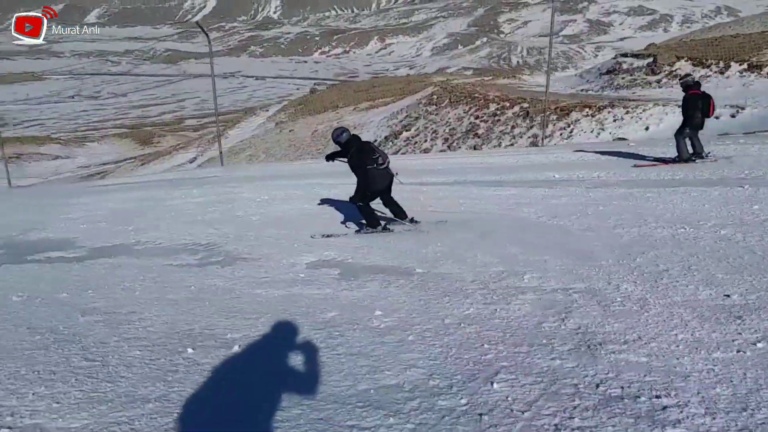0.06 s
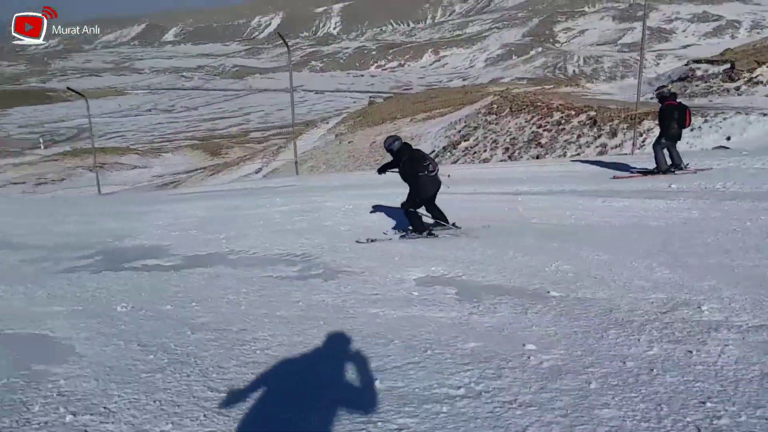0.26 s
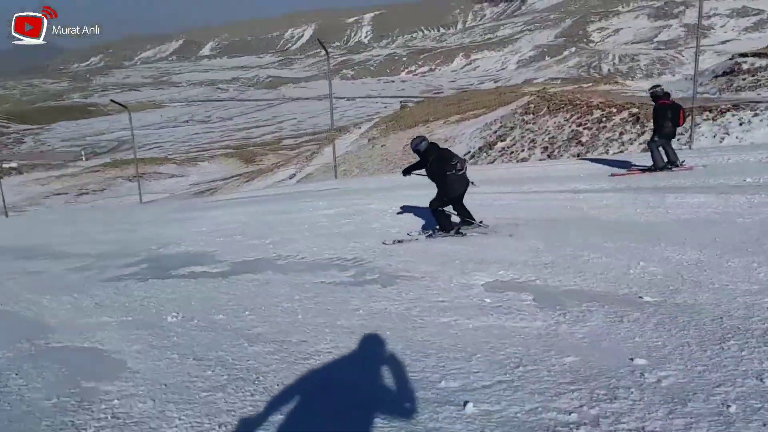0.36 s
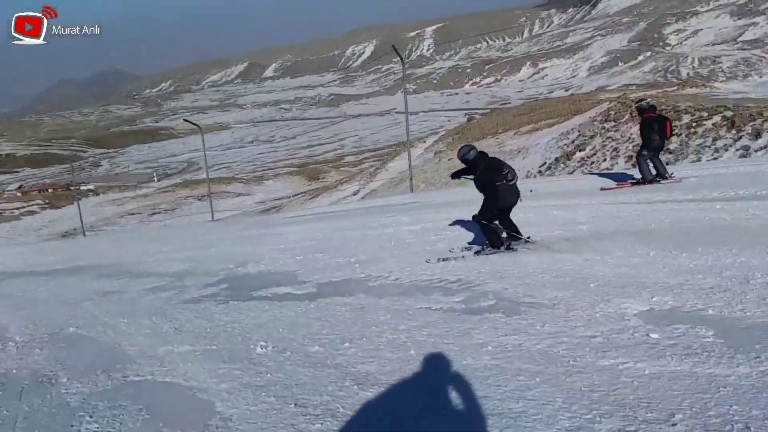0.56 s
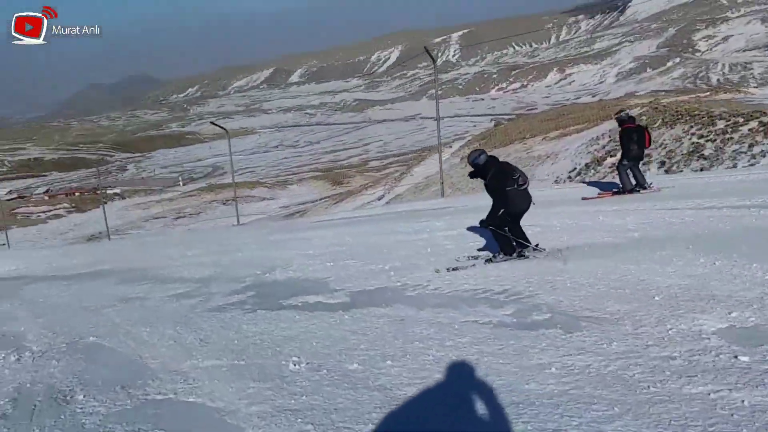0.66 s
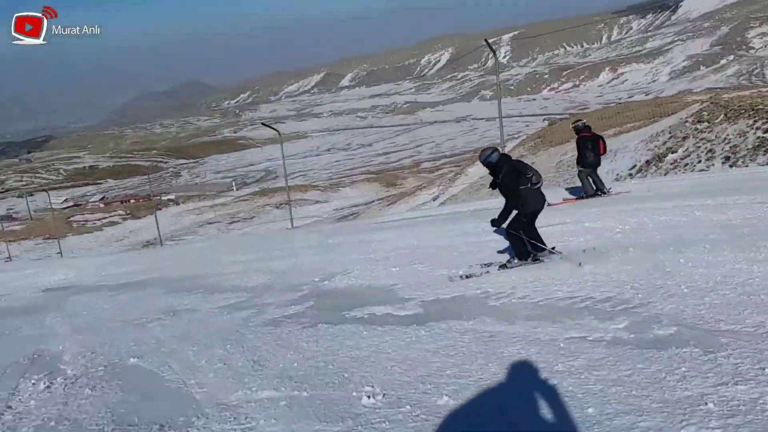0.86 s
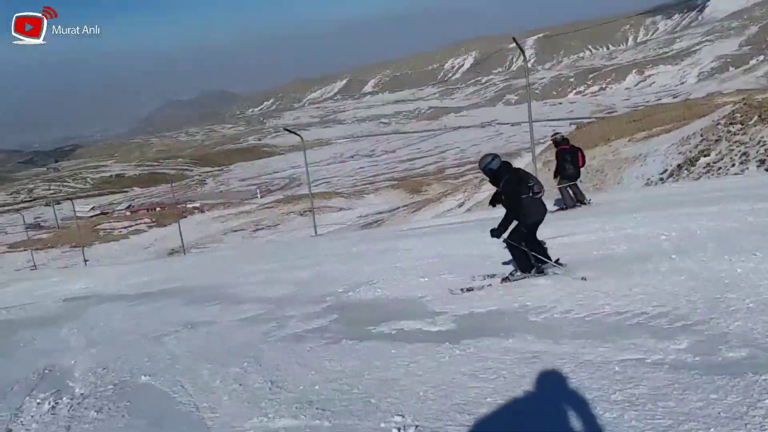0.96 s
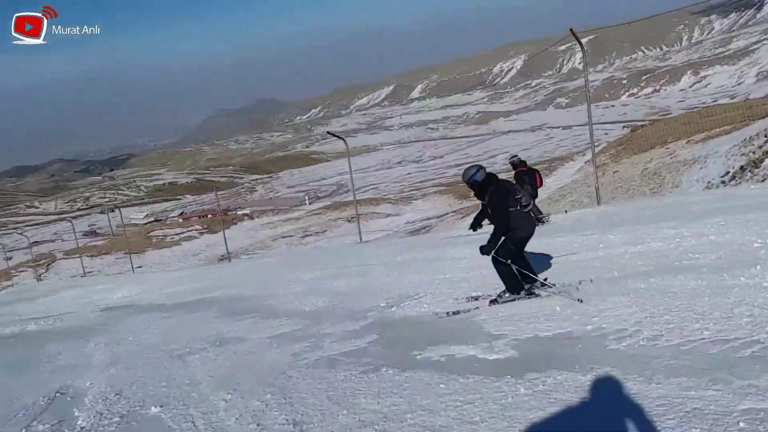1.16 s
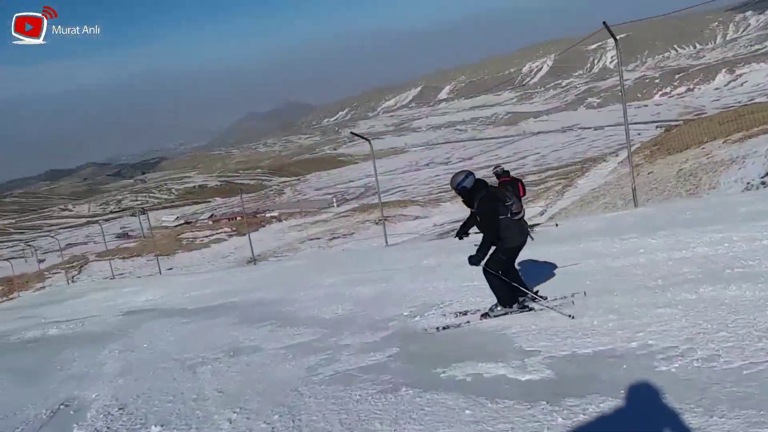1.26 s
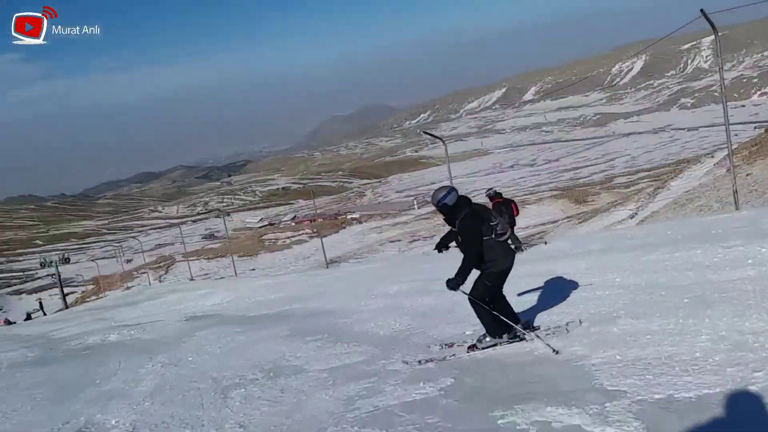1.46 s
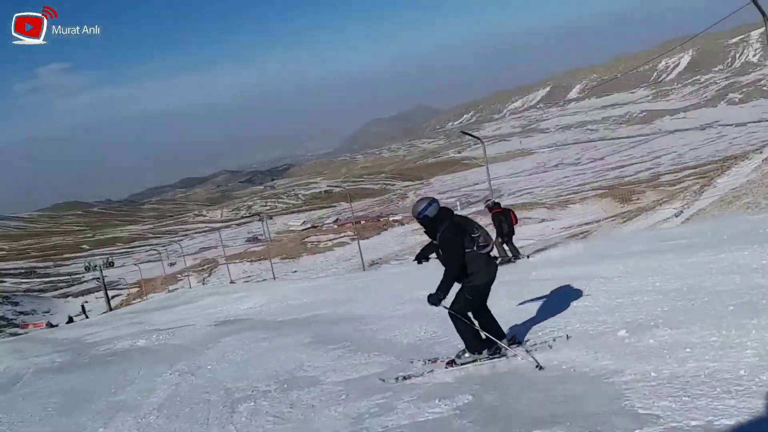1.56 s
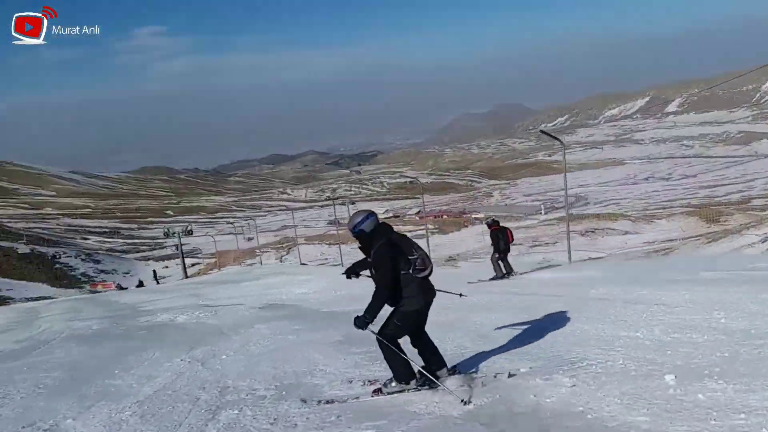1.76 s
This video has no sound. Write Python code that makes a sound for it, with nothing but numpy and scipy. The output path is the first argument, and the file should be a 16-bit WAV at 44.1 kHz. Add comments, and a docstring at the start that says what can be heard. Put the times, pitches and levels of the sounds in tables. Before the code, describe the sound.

A ski turn scraping on hard, icy snow, heard close outdoors. Faint crunchy gliding begins, then from 0.2 seconds the edges bite and the scrape swells to a coarse, low-mid roar by 0.4, with wind buffeting on the left. It stays loud until about 1.15, with hissing spray, hollow knocks and a faint steely rasp, then falls away by 1.5 to soft crunching and small clicks.

```python
"""A hard carved turn on icy snow

Steel ski edges chip the crust: random clicks in bursts, filtered by the ski body, with hissing ice spray.
The edge sings faintly as it bites deeper, and the flat bases crunch and knock over lumps of ice.
The sound reaches two microphone ports with differing colour and phase; gusts buffet mainly the left port."""
import sys
import numpy as np
from scipy import signal
from scipy.fft import rfft, irfft, next_fast_len
from scipy.io import wavfile
from scipy.ndimage import uniform_filter1d, minimum_filter1d

SR = 44100
rng = np.random.default_rng(int(sys.argv[2]) if len(sys.argv) > 2 else 0)


def inscribe(sig):
    """Save sig as 16-bit PCM at rate SR to the path in sys.argv[1].

    A 1-D sig is mono; a 2-D sig holds one channel per row.
    Samples are clipped to [-1, 1] before scaling.
    """
    pcm = np.round(np.clip(np.atleast_2d(sig).T, -1, 1) * 32767)
    wavfile.write(sys.argv[1], SR, pcm.astype(np.int16))


def undo_db(level):
    """Turn decibels back into plain size, where 20 dB means ten times bigger."""
    steps = np.asarray(level, float) / 20
    return 10 ** steps


N = 79380  # samples, 1.8 s


def evened(x):
    """Normalisation: scales the mean power to 1."""
    return x / np.sqrt(np.mean(x ** 2) + 1e-20)


def read(points, hz):
    """Spectral interpolation: reads a curve on a log-frequency axis."""
    point_hz, value = np.transpose(points)
    return np.interp(np.log(hz + 1), np.log(point_hz + 1), value)


def along(rows, column=1):
    """Envelope: reads one column of a time curve at every sample."""
    rows = np.array(rows)
    return np.interp(np.arange(N) / SR, rows[:, 0], rows[:, column])


def colour(x, points, size=4096):
    """Minimum-phase filtering: the spectrum in dB fixes a causal response through the Hilbert transform."""
    log_gain = read(points, np.abs(np.fft.fftfreq(size, 1 / SR))) * np.log(10) / 20
    phase = -signal.hilbert(log_gain).imag
    taps = np.fft.ifft(np.exp(log_gain + 1j * phase)).real[:size // 2]
    return signal.oaconvolve(x, taps[None], axes=1)[:, :x.shape[1]]


def wobble(low_hz, top_hz):
    """Superposition: thirty slow sines of random phase make an irregular sway of rms 1."""
    t = np.arange(N) / SR
    sway = 0
    for hz in np.geomspace(low_hz, top_hz, num=30):
        sway = sway + np.sin(2 * np.pi * (hz * t + rng.random())) / hz ** 0.074
    return evened(sway)


def chips(per_s, spread_db):
    """Shot noise: random clicks, most small, a few large; one train straight on, one scattered."""
    boost_db = spread_db * np.minimum(rng.exponential(1, (2, N)), 5)
    size = undo_db(boost_db) * rng.standard_normal((2, N))
    return size * (rng.random((2, N)) < per_s / SR)


# Edge pressure through the turn. Each row: time in seconds, scrape level in dB, spray level in dB,
# extra flex of the whole ski, heard in the lowest range, in dB.
TURN = [(0, -35, -43.5, 0), (.15, -32.5, -40, -2), (.2, -25.5, -37.5, 0), (.29, -15.5, -33, 0),
        (.36, -10.5, -31.5, 1.5), (.45, -9, -28, 3), (.6, -9.5, -31, -7), (.75, -9.5, -31, -4),
        (.95, -11.5, -37.5, 0), (1.056, -11, -32, -0.5), (1.085, -12.5, -34, 1), (1.115, -11, -32, 0),
        (1.19, -15, -38.5, 1), (1.25, -17.5, -38.5, -4), (1.3, -20, -38, 1), (1.345, -21, -42, 3),
        (1.39, -27.5, -40, 0), (1.5, -32, -40.5, 2.5), (1.61, -33.5, -41.5, 0), (1.8, -37.5, -39.5, 3)]
RASP_DB, RASP_FROM_S, RASP_FULL_S = -26, 0.4, 0.93  # full level relative to the scrape; onset and full bite


def carved_turn():
    """Common modulation: scrape and spray share one chatter and follow the edge pressure."""
    chatter = wobble(20, 110)
    scrape = edge_scrape(chatter, along(TURN, column=3))
    spray = ice_spray(chatter)
    bite = np.clip((np.arange(N) / SR - RASP_FROM_S) / (RASP_FULL_S - RASP_FROM_S), 0, 1)
    scrape = scrape + undo_db(RASP_DB) * bite * steel_rasp()
    return scrape * undo_db(along(TURN, column=1)) + spray * undo_db(along(TURN, column=2))


CHIPS_PER_S, CHIP_SPREAD_DB = 1100, 2  # base rate of each train; mean boost of a chip
CHATTER_DB, PATCH_DB = 1, 0.72  # rms level sway shared by all patches, and of each patch alone
# Each stretch of edge shakes one range of the ski. Each entry: boundary between ranges in Hz.
PATCH_EDGES_HZ = [0, 230, 420, 780, 1500, 2700, 4500, 23000]
# Ski body shaken by the edge. Each row: frequency in Hz, relative level per Hz in dB.
SCRAPE = [(24, -48), (40, -52), (69, -29), (101, -20.5), (187, -7), (224, -2.5), (329, -1), (422, -4.5),
          (567, -7), (727, -11), (833, -15), (912, -12), (1140, -10.5), (1570, -21), (1970, -22.5),
          (2160, -22.5), (2750, -29.5), (3500, -27.5), (4170, -30.5), (8040, -42), (9000, -58),
          (11700, -81), (19800, -120)]


def edge_scrape(chatter, flex_db):
    """Forced vibration: chips break off in bursts along the edge and shake the ski, range by range."""
    hz = np.fft.rfftfreq(N, 1 / SR) + 1  # 1 Hz is added to avoid dividing by zero
    body = 0
    for low, top in zip(PATCH_EDGES_HZ, PATCH_EDGES_HZ[1:]):
        bursts_db = CHATTER_DB * chatter + PATCH_DB * wobble(17, 90)
        patch = evened(chips(CHIPS_PER_S + 2 * low, CHIP_SPREAD_DB)) * undo_db(bursts_db)
        if low == 0:
            patch = patch * undo_db(flex_db)
        band = 1 / np.sqrt((1 + (low / hz) ** 10) * (1 + (hz / top) ** 10))
        body = body + rfft(patch) * band
    return evened(colour(irfft(body, N), SCRAPE))


GRAINS_PER_S, GRAIN_SPREAD_DB, SPRAY_CHATTER_DB = 13000, 1.5, 0.5
# Hiss of flying ice. Each row: frequency in Hz, relative level per Hz in dB.
SPRAY = [(300, -24), (1200, -5), (2000, 1.5), (2750, -3), (3400, -14), (4500, -12.5), (8000, -13.5),
         (9800, -20), (13000, -21), (16000, -25.5)]


def ice_spray(chatter):
    """Dense shot noise: thousands of grains merge into a hiss that sways partly with the chatter."""
    sway_db = SPRAY_CHATTER_DB * (1.3 * chatter + wobble(16, 35.0))
    return evened(colour(chips(GRAINS_PER_S, GRAIN_SPREAD_DB) * undo_db(sway_db), SPRAY))


RASP_HZ, RASP_WIDTH_HZ = 3330, 410  # centre; full width at half amplitude


def steel_rasp():
    """Resonance: chips excite the steel edge in one band, so that it sings."""
    hz = np.fft.rfftfreq(N, 1 / SR) + 1
    steel = 1 / (1 + ((hz - RASP_HZ) / (RASP_WIDTH_HZ / 2)) ** 2)
    scratches = chips(CHIPS_PER_S, CHIP_SPREAD_DB) * undo_db(PATCH_DB * 2 * wobble(6.2, 40))
    return evened(irfft(rfft(scratches) * steel, N))


CRUMBS_PER_S, CRUMB_SPREAD_DB, GLIDE_WAVER_DB = 4300, 1, 1.3
# Bases sliding flat. Each row: time in seconds, level in dB.
GLIDE = [(0, -32), (.2, -31.5), (.7, -35.5), (1.3, -40), (1.55, -35), (1.63, -43), (1.68, -34),
         (1.705, -33.5), (1.74, -32.5), (1.8, -29)]
# Colour of the sliding. Each row: frequency in Hz, relative level per Hz in dB.
GLIDE_TONE = [(35, -60), (60, -25), (128, -4), (244, -14), (458, -5.5), (727, -2), (1420, -1.5), (1990, -7),
              (2160, -10), (3970, -6.5), (9000, -25), (11700, -68), (19800, -120)]


def bases():
    """Friction noise: flat sliding crushes crumbs into a finer, brighter crunch."""
    crumbs = chips(CRUMBS_PER_S, CRUMB_SPREAD_DB) * undo_db(GLIDE_WAVER_DB * wobble(25, 110))
    return evened(colour(crumbs, GLIDE_TONE)) * undo_db(along(GLIDE))


RING_WIDTH = .25  # bandwidth of each resonator, as a share of the ring pitch
FIRST_BLOW, BLOWS_PER_S = 3.5, 3500  # the first contact against the rms size of later ones; their rate
CRACK_EASE = .6  # share of the first contact that the snow cushions out of the crack
# Skis knocking over lumps of ice. Each row: start in seconds, peak of the ring in dB, ring pitch in Hz,
# peak of the crack relative to the ring in dB, time for the blows to fall by 20 dB in seconds (at least .002).
KNOCKS = [(0.172, -20, 365, -25, 0.015), (0.235, -39, 400, 9, 0.0081), (0.246, -37, 680, 8, 0.012),
          (0.276, -15.5, 279, 3, .015), (0.316, -13, 269, 0.5, 0.019), (0.601, -3.5, 347, -19, 0.013),
          (.677, -5, 580, -2, 0.013), (0.843, -8, 460, -16, 0.0051), (0.875, -6.5, 387, -10, .014),
          (1.018, -15.5, 395, 5, 0.014), (1.051, -10, 330, 2.5, 0.013), (1.114, -10, 298, -7, 0.013),
          (1.16, -5.5, 302, -15, 0.013), (1.211, -19, 330, -2, .008), (1.319, -17, 450, -5, .01),
          (1.402, -18.5, 390, -17, 0.013), (1.434, -18.5, 562, -18, 0.019), (1.51, -24, 330, -2, 0.015),
          (1.664, -20, 610, -3, 0.0045), (1.667, -20.5, 429, 1.5, 0.026), (1.711, -38, 356, 15, 0.0071),
          (1.716, -27.5, 400, 5, 0.017), (1.772, -38, 1110, 4, 0.0025), (1.781, -19, 960, -13, 0.0049),
          (1.796, -22, 940, 11, 0.0044)]
# Colour of the crack. Each row: frequency in Hz, relative level per Hz in dB.
KNOCK_CRACK = [(250, -28), (600, 1), (1200, -2), (2500, -3.5), (4500, -12.5), (9000, -42)]


def knocks():
    """Impact excitation: a sharp blow and a short rattle ring the ski, with a crack on top."""
    length = 4000  # samples
    out, t = np.zeros((2, N + length)), np.arange(length) / SR
    for start_s, db, ring_hz, crack_db, fall_s in KNOCKS:
        rattle = rng.standard_normal((2, length)) * (rng.random((2, length)) < BLOWS_PER_S / SR)
        decay = undo_db(-20 * (t / max(fall_s, .002)) ** 1.8)
        blows = (rattle + FIRST_BLOW * (t == 0)) * decay
        # two equal resonators in a row, with two zeros at 0 Hz
        radius = np.exp(-np.pi * RING_WIDTH * ring_hz / SR)
        poles = [1, -2 * radius * np.cos(2 * np.pi * ring_hz / SR), radius * radius]
        ring = signal.lfilter(np.convolve([1, -1], [1, -1]), np.convolve(poles, poles), blows)
        ring = ring / abs(ring).max(1)[:, None]
        crack = colour(blows - CRACK_EASE * blows * (t == 0), KNOCK_CRACK)
        crack = crack / abs(crack).max()
        at = round(start_s * SR)
        out[:, at:at + length] += undo_db(db) * (ring + undo_db(crack_db) * crack)
    return out[:, :N]


# The two microphone ports. SAME: each row: frequency in Hz, likeness of the ports from 0 to 1.
SAME = [(60, .8), (120, .96), (250, .998), (440, .993), (640, .965), (900, .86), (1100, .76), (1550, .72),
        (2200, .6), (3200, .46), (5500, .46), (8000, .3), (12000, .3)]
# Each row: frequency in Hz, phase lead of the left port in radians.
LEAD = [(100, .13), (370, .13), (530, -.04), (640, -.15), (760, -.03), (910, .45), (1090, .9), (1300, 1.72),
        (1570, 2.2), (2250, 1.75), (2700, 2.2), (3250, 1.7), (3900, 2.5), (5500, 2.5), (7000, 1.5),
        (13000, 1.7)]
# Each row: frequency in Hz, left minus right level in dB.
TILT = [(90, -0.5), (220, -1.7), (440, 0.5), (640, -2), (760, -6), (910, -9.5), (1090, -11.5), (1300, -10),
        (1570, -6.5), (1880, -2.5), (2250, 1.5), (2700, -4.5), (3500, 0), (5500, -4), (6600, 2), (8000, -4),
        (13000, 0)]


def ports(x):
    """Partial coherence: straight and scattered sound mix at two ports with differing colour and phase."""
    size = next_fast_len(N + 2048)
    hz = np.fft.rfftfreq(size, 1 / SR)
    straight, scattered = rfft(x, size)
    same = np.clip(read(SAME, hz), 0, 1)
    tilt = undo_db(read(TILT, hz) / 2)  # half of the difference goes to each port
    led = same * np.exp(1j * read(LEAD, hz)) * straight
    left = (led + np.sqrt(1 - same ** 2) * scattered) * tilt
    return irfft(np.array([left, straight / tilt]), size)[:, :N]


WIND_LUMPS_DB, WIND_RIGHT_DB = 3.0, -19  # rms level sway; right port relative to left
# Gusts on the left port. Each row: time in seconds, level in dB.
GUSTS = [(0, -27.5), (.075, -43.5), (.15, -34.5), (.22, -48), (.31, -37), (.37, -12), (.41, -24),
         (.46, -16), (.53, -38), (.6, -56), (1.28, -62), (1.35, -34), (1.41, -38), (1.46, -60), (1.8, -50)]
# Colour of the buffeting. Each row: frequency in Hz, relative level per Hz in dB.
WIND = [(25, -26), (50, -10), (90, 2), (200, -7), (400, -6.5), (900, -31), (3000, -80)]


def wind():
    """Turbulent pressure noise: lumpy low buffeting from noise that is independent in the two ports."""
    lumps = rng.standard_normal((2, N)) * undo_db(WIND_LUMPS_DB * wobble(8, 58.7))
    port_gain = undo_db(np.array([[0], [WIND_RIGHT_DB]]))
    return evened(colour(lumps, WIND)) * undo_db(along(GUSTS)) * port_gain


def scene():
    """Linear superposition: the skis arrive through the ports, and the wind acts at the ports directly."""
    skis = carved_turn() + bases() + knocks()
    return ports(skis) + wind()


def low_pass(x):
    """Removes everything above the highest recorded frequency."""
    return signal.sosfilt(signal.butter(12, 16310, fs=SR, output="sos"), x)


LIMIT_DB, LIMIT_HOLD_S = -0.5, .006  # ceiling relative to full scale; window of the gain


def record(dry):
    """Peak limiting: a smoothed gain, common to both channels, eases the loudest peaks down."""
    hold = round(LIMIT_HOLD_S * SR)
    room = np.minimum(undo_db(LIMIT_DB) / (abs(dry).max(0) + 1e-9), 1)
    gain = uniform_filter1d(minimum_filter1d(room, hold), hold)
    return low_pass(dry * gain)


dry = scene()
out = record(dry)
inscribe(out)
```